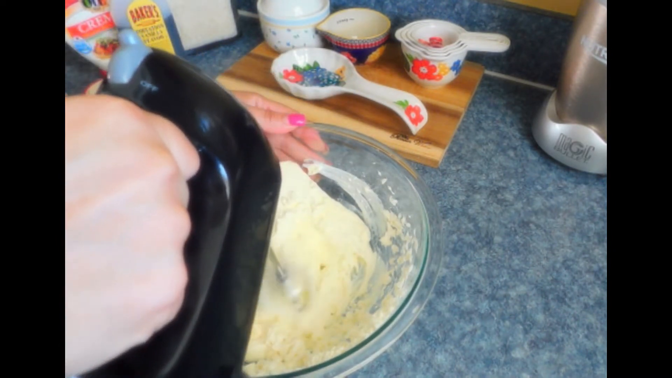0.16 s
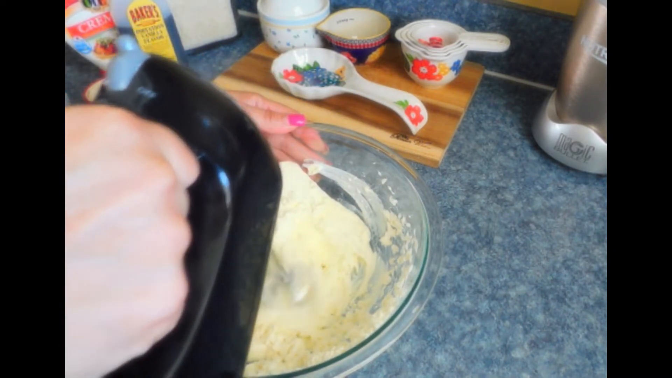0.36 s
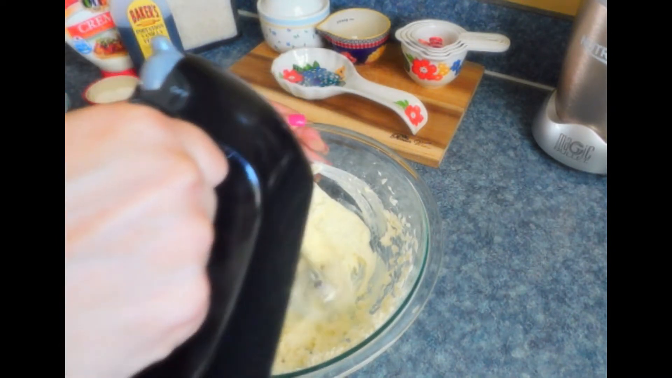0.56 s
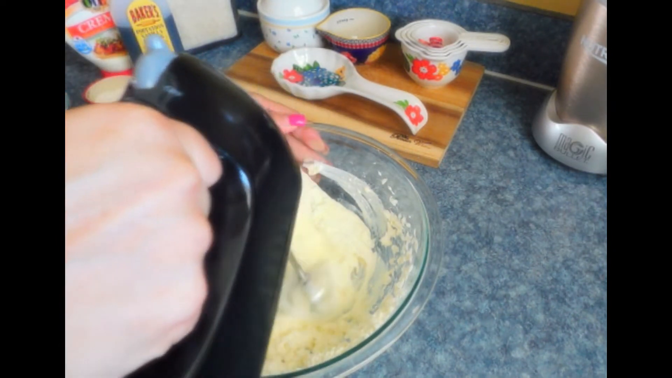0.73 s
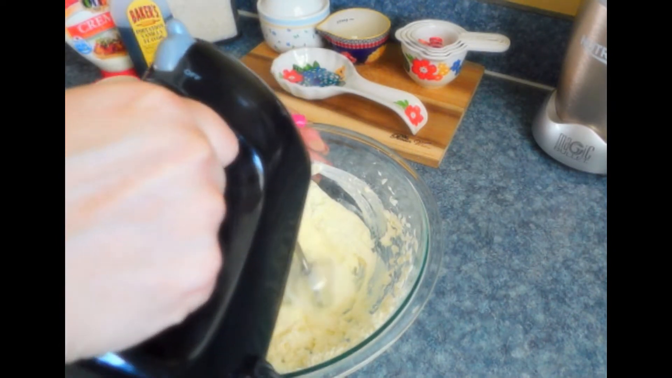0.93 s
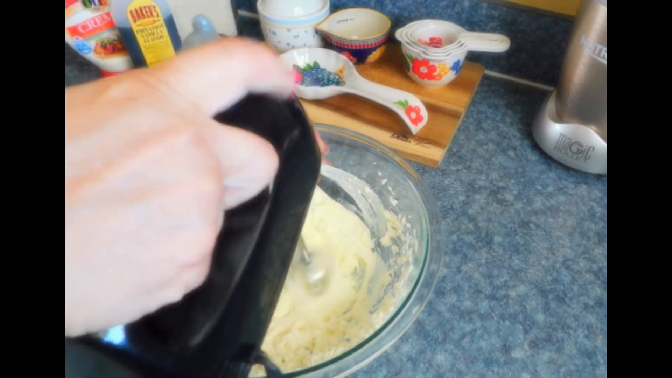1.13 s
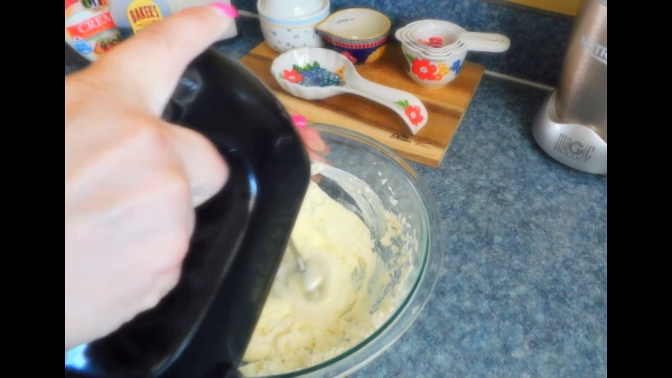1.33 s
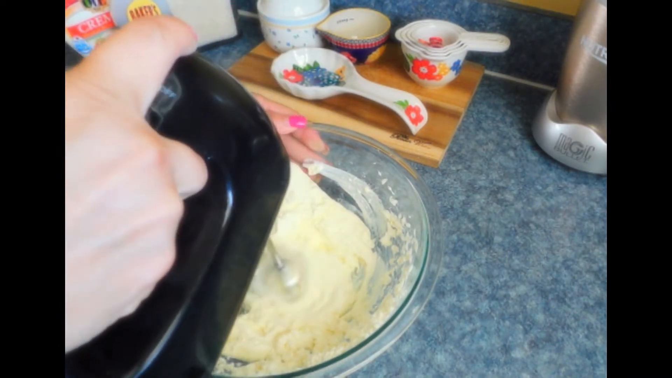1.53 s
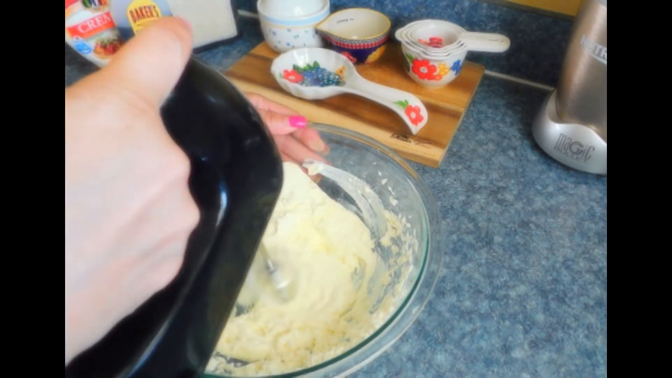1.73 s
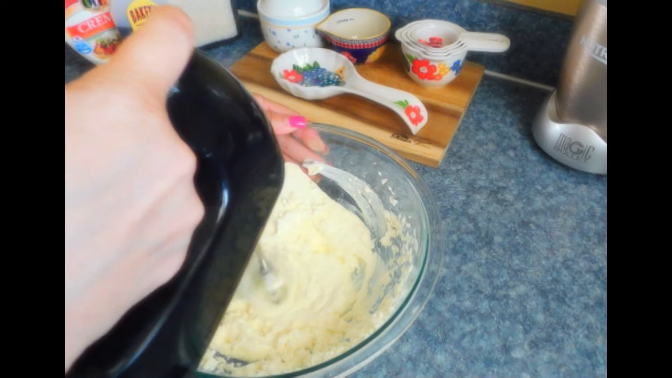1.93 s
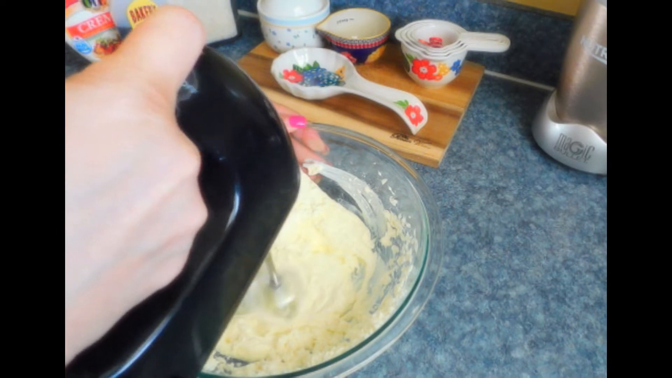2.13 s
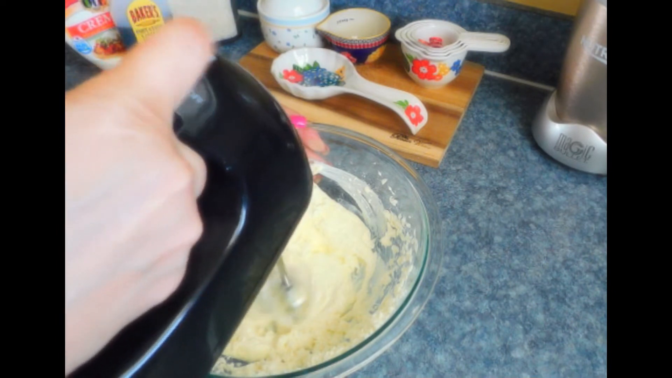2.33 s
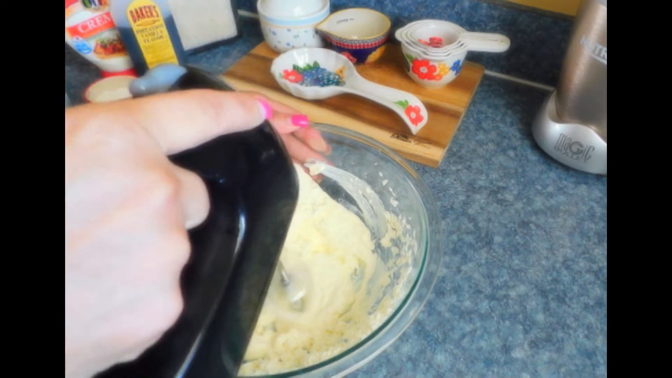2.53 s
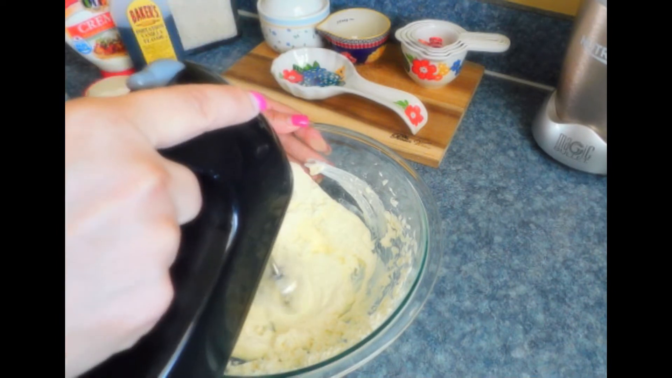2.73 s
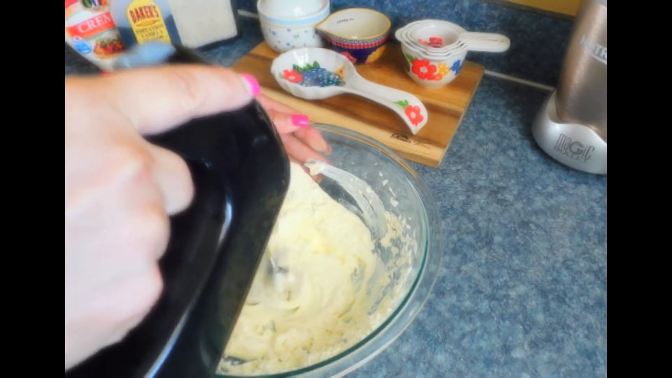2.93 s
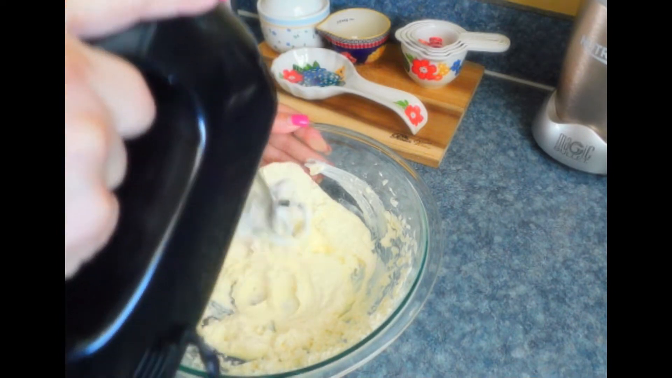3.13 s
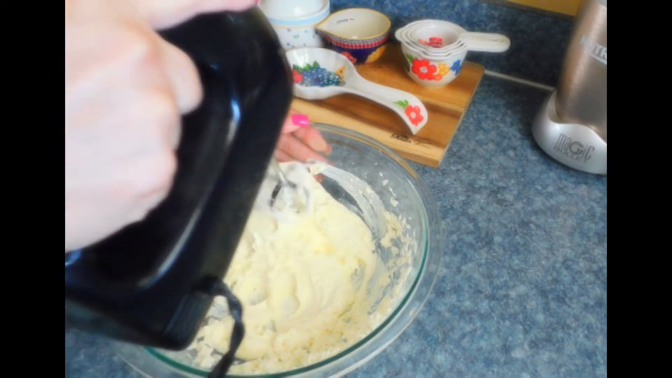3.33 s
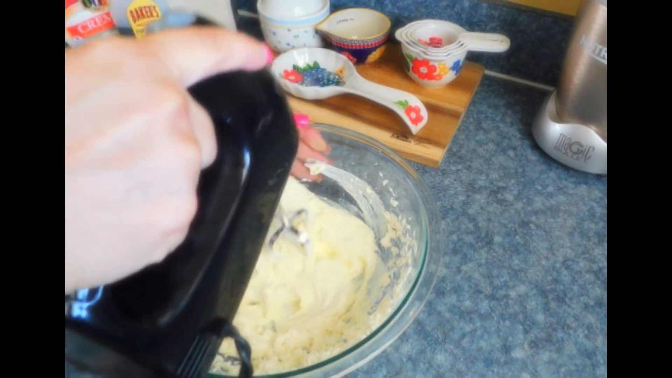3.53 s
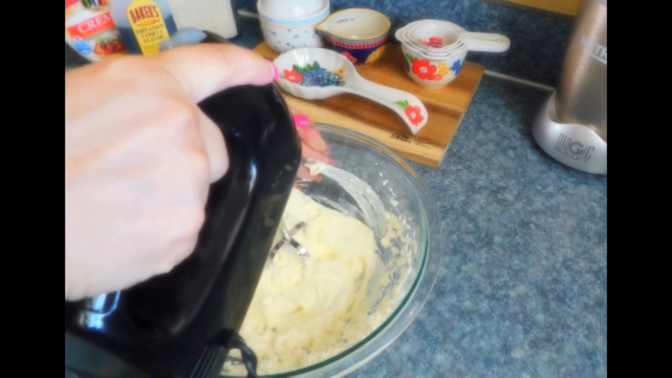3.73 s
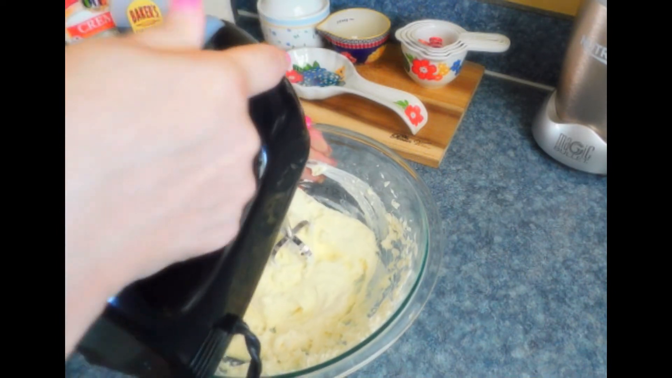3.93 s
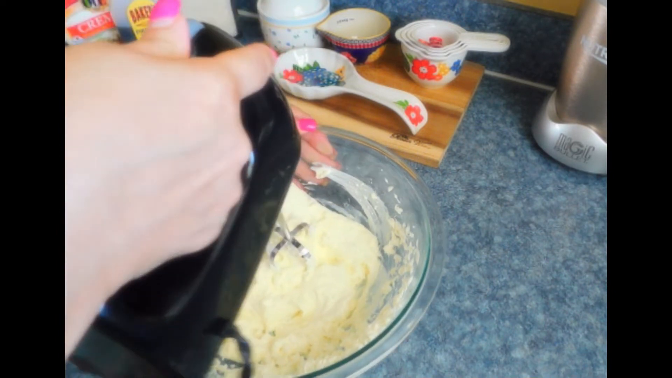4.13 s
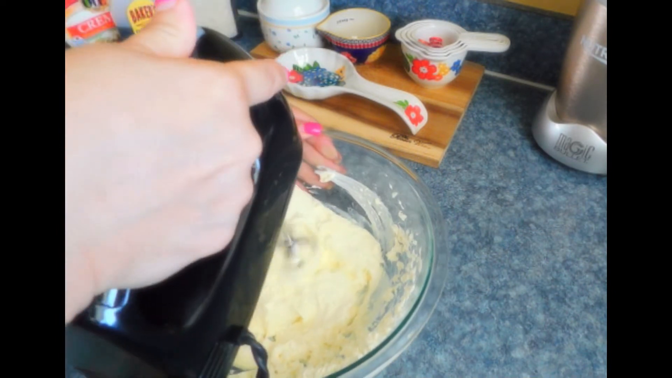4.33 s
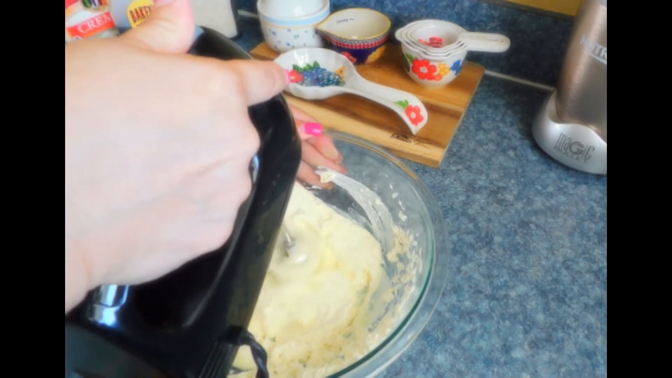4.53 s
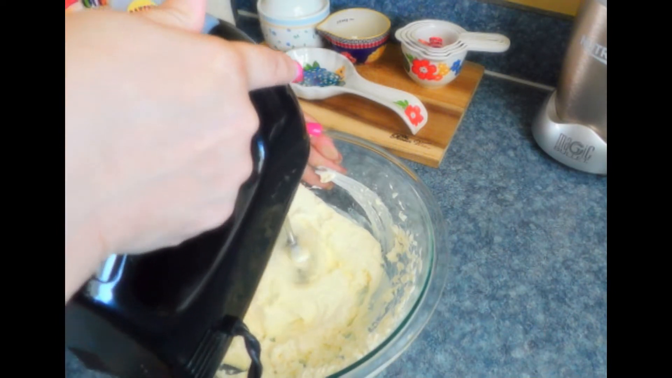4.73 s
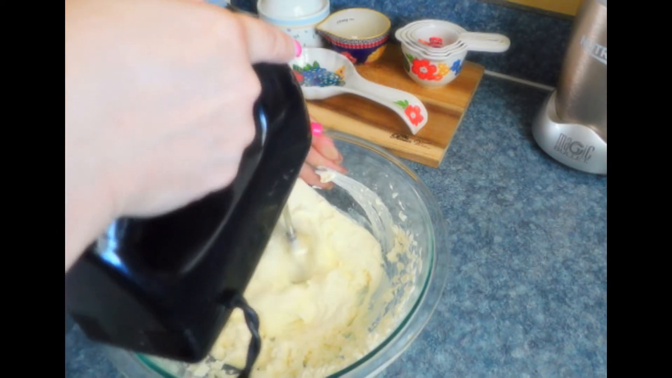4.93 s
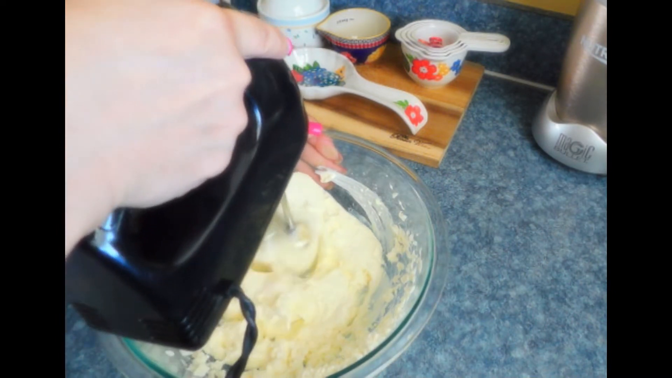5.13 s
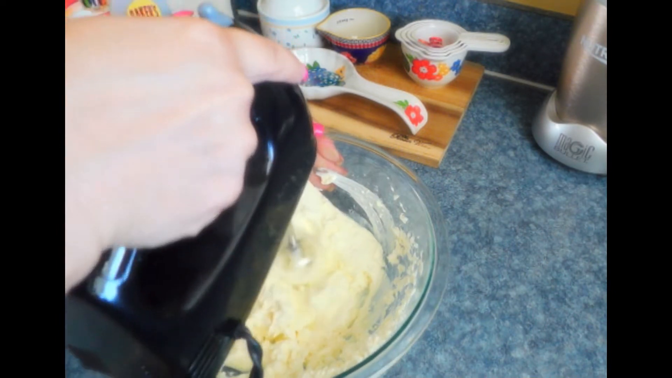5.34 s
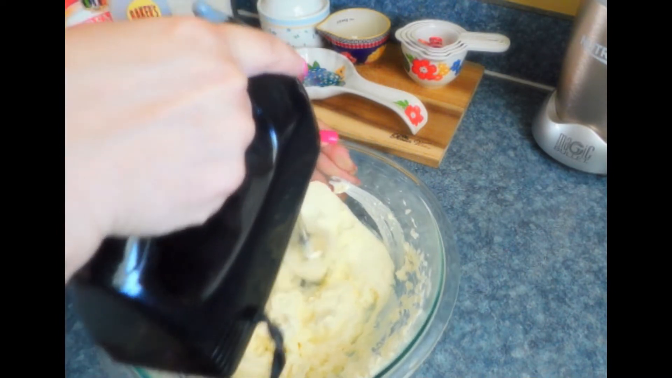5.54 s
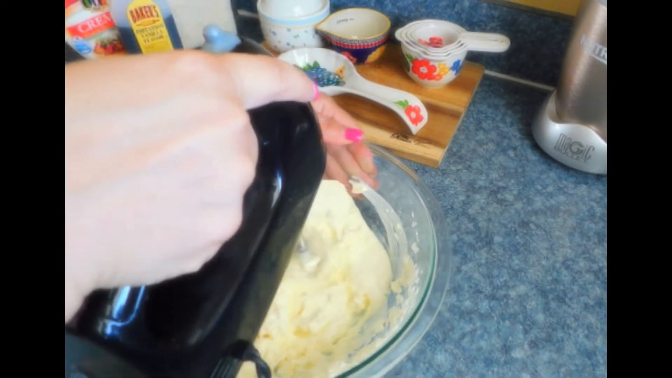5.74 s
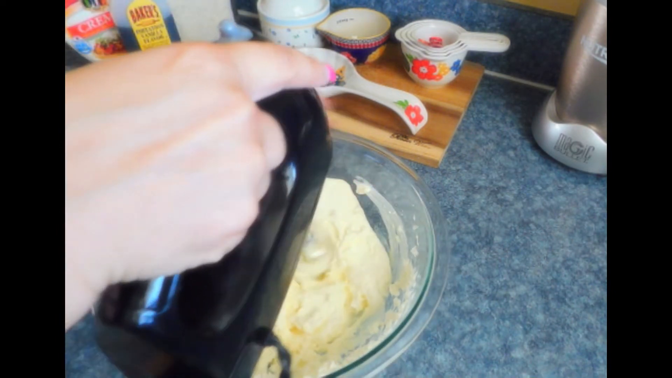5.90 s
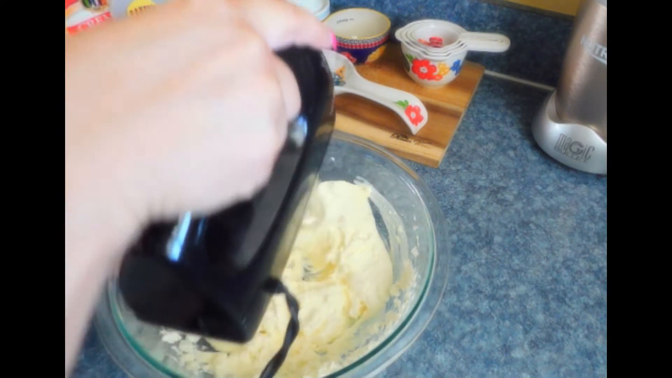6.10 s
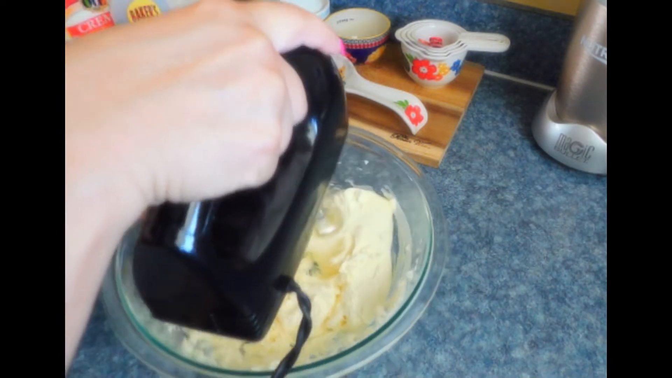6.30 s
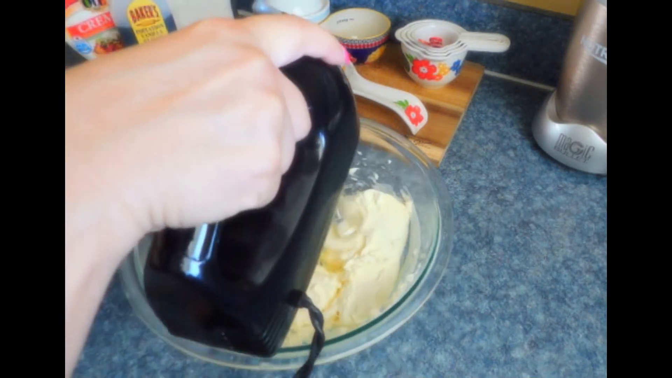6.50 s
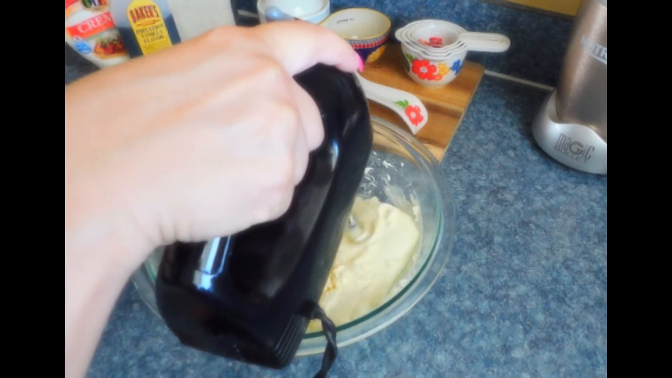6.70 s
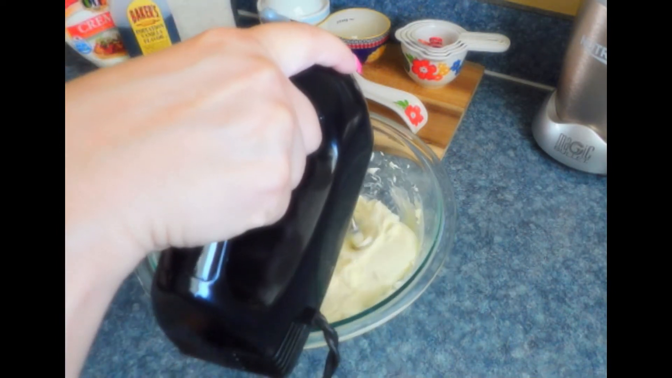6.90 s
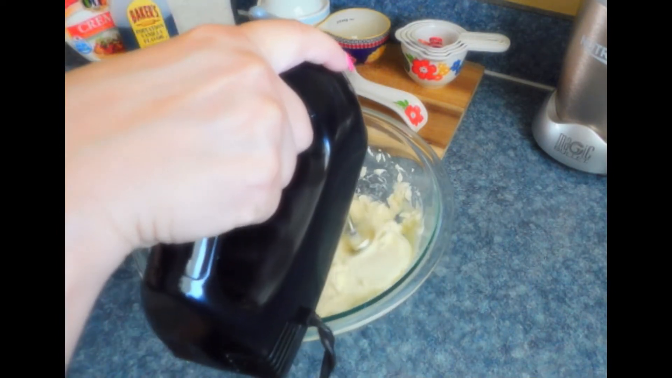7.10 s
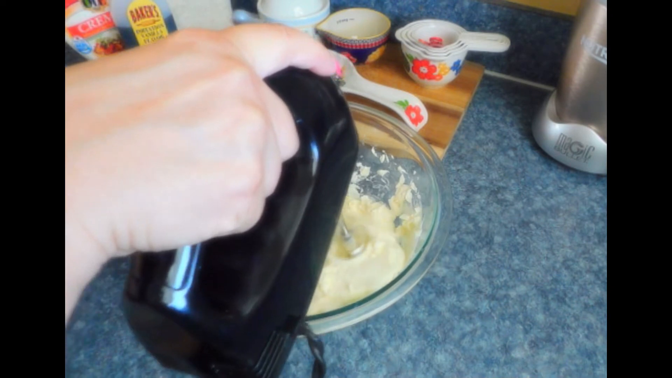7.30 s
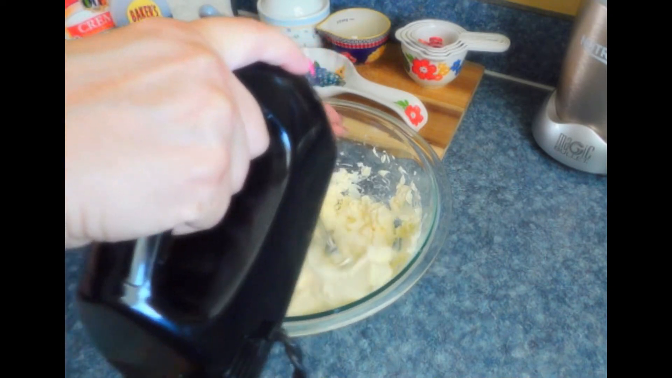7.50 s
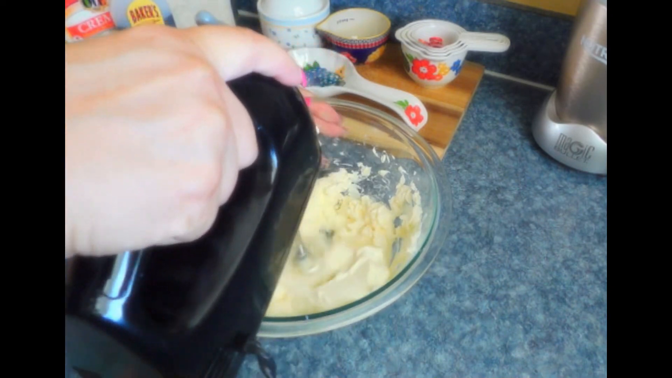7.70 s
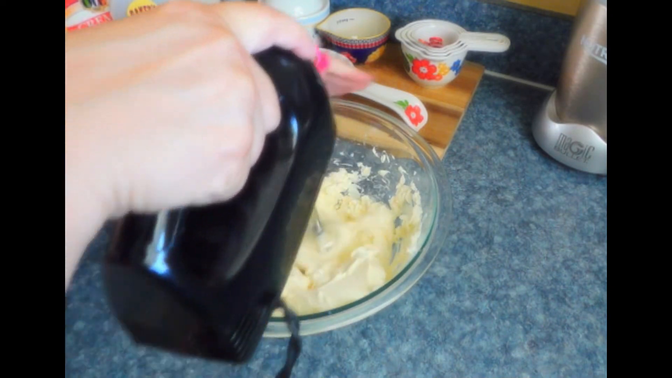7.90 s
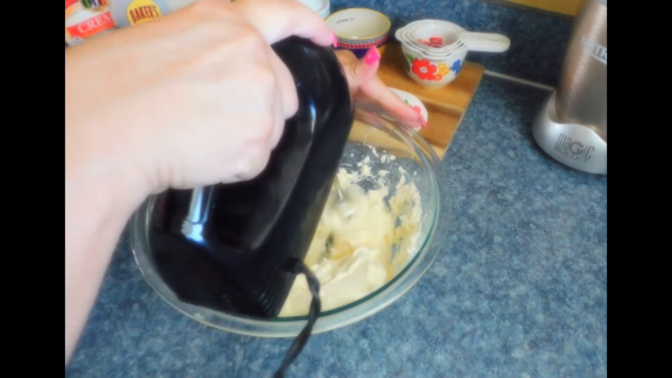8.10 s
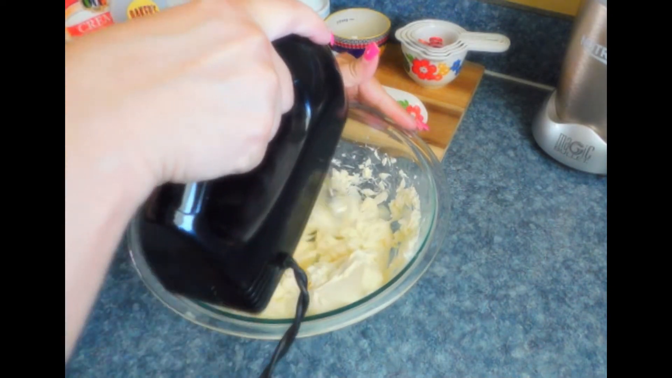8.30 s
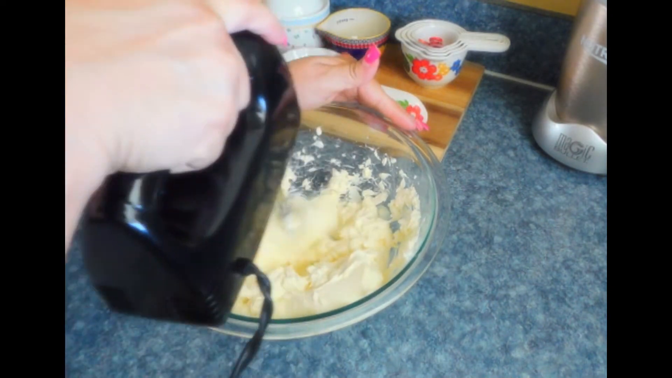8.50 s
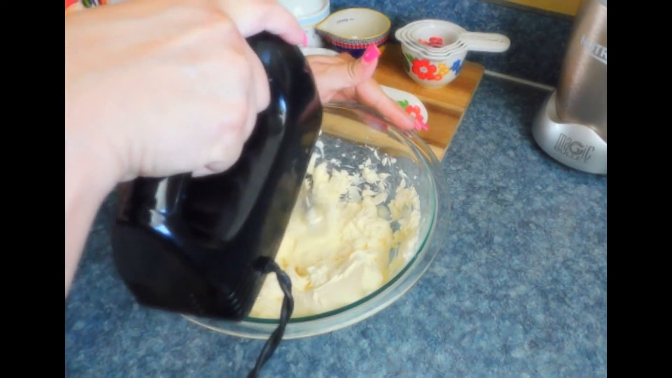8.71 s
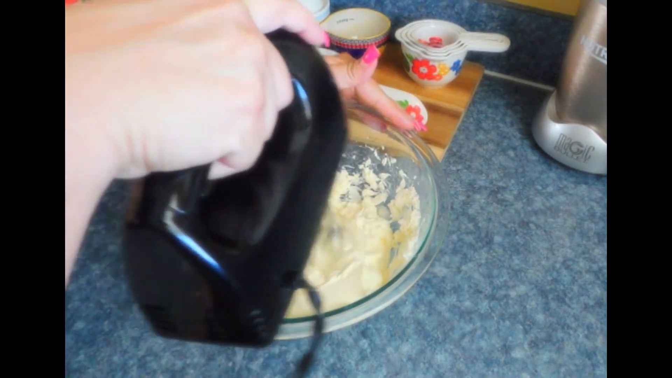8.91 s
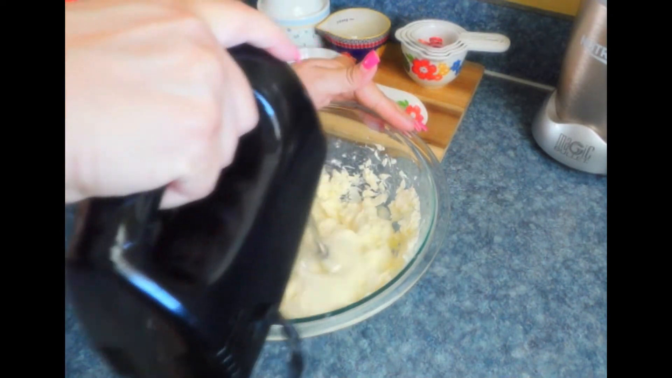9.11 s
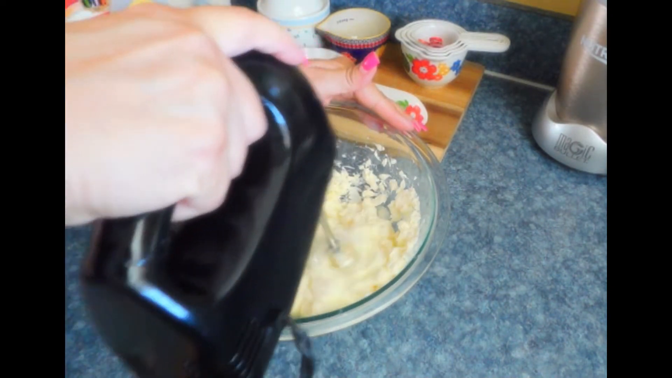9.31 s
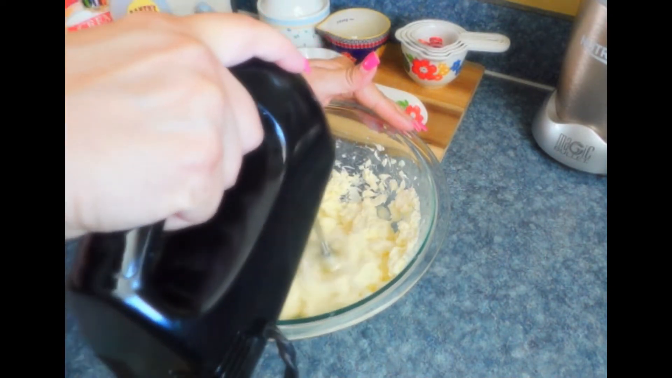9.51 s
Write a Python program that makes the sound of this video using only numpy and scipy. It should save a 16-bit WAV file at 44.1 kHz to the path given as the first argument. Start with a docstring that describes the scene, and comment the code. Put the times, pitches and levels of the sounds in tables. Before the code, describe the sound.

An electric hand mixer hums, whines and rattles close by as its beaters churn soft cheese and now and then knock the glass bowl. It is switched off and winds down. In the short pause the casing clicks and steel clanks on the bowl. The motor then growls back up and keeps mixing at a lower pitch, with more clattering and bumping against the glass, in a small kitchen.

```python
"""A kitchen counter, a stereo pair close to a glass bowl. An electric hand mixer is beating soft cheese:
the motor hums and whines on multiples of its shaft speed, worm gears rattle the housing, brushes hiss,
and the beaters slap the cheese and clatter on the glass. At 2.2 s it is switched off and coasts to a
stop; the casing clicks and steel clanks on the bowl. At 4.3 s it growls back up to speed and is pressed
into the mixture again and again. Counter, tiles and the small room answer throughout."""
import sys
import numpy as np
from scipy import signal
from scipy.fft import rfft, irfft
from scipy.io import wavfile
from scipy.ndimage import uniform_filter1d

SR = 44100
rng = np.random.default_rng(int(sys.argv[2]) if len(sys.argv) > 2 else 0)


def pcm_store(signal):
    """Save signal as 16-bit PCM."""
    levels = np.round(np.clip(np.atleast_2d(signal), -1, 1) * 32767)
    wavfile.write(sys.argv[1], SR, levels.astype(np.int16).T)


N = 421155
TIME = np.arange(N) / SR
TAPS = 8192
FREQ = np.maximum(np.arange(TAPS // 2 + 1) * SR / TAPS, 1)
SWITCH_OFF_S, STOP_S, RESTART_S, RUN_UP_S = 2.19, 3.37, 4.285, .215
WORKING_HZ, MAINS_HZ = 300, 60
GEAR_TEETH = 20  # shaft turns to one beater turn
POWERED = (TIME < SWITCH_OFF_S) | (TIME > RESTART_S)
MAINS_PULSE = POWERED * np.cos(4 * np.pi * MAINS_HZ * TIME)  # the magnetic pull peaks twice a cycle

# resonances of the glass bowl, damped by cheese: f/Hz, width/Hz, level/dB
BOWL_MODES = [(447, 62, -6), (673, 51, 2.5), (770, 28, 6), (878, 31, 5.5), (1004, 72, -1), (1197, 91, 3),
              (1370, 150, -40), (2460, 290, -18), (4270, 7500, -12.5)]


def undb(db):
    """Decibels to gain."""
    return 10 ** (np.asarray(db) / 20)


def unit(x):
    """Scale to rms 1."""
    return x / np.sqrt(np.mean(x ** 2))


def curves(*tables):
    """Join tables in time and give each column at every sample."""
    seconds, *columns = np.vstack(tables).T
    return [np.interp(TIME, seconds, column) for column in columns]


def walk(rate):
    """Random levels held 1 / rate s and slewed twice; spread near 1."""
    hold = max(int(SR / rate), 1)
    steps = np.repeat(rng.standard_normal(N // hold + 1), hold)
    return 1.36 * uniform_filter1d(uniform_filter1d(steps, hold), hold)[:N]


def response(gain):
    """Causal impulse response with the given gain on FREQ."""
    cepstrum = irfft(np.log(gain + 1e-6))
    cepstrum[1:TAPS // 2] *= 2
    cepstrum[TAPS // 2 + 1:] = 0
    return irfft(np.exp(rfft(cepstrum)))


def colour(points):
    """Response of a smooth spectrum."""
    hz, db = np.transpose(points)
    return response(undb(np.interp(np.log(FREQ), np.log(hz), db)))


def body(modes):
    """Response of an object with these resonances; each radiates little below its pitch."""
    power = sum(undb(db) ** 2 / (1 + ((FREQ ** 2 - hz ** 2) / (FREQ * width)) ** 2)
                / (1 + (hz / FREQ / 2) ** 4) for hz, width, db in modes)
    return response(np.sqrt(power))


def resonance_gain(hz, modes):
    """Gain that a set of resonances gives a tone at hz."""
    return sum(undb(db) / (1 + (2 * (hz - centre) / width) ** 2) for centre, width, db in modes)


def through(x, impulse):
    """Pass a sound through a response."""
    return signal.fftconvolve(x, impulse)[:N]


def rolloff(x, hz, kind, order=1):
    """High-pass or low-pass, gentle by default."""
    return signal.sosfilt(signal.butter(order, min(hz, SR / 2 - 1), kind, fs=SR, output="sos"), x)


def noise(impulse, force=1):
    """Noise that follows a force and passes through a response, at rms 1."""
    return unit(through(force * rng.standard_normal(N), impulse))


def wide(source, hz=3500):
    """A source that radiates from many spots: the microphones share its lows but not its treble."""
    mid, side = source(), rolloff(source(), hz, "high")
    return np.array([mid + side, mid - side])


def pulses(places, sizes, turns):
    """Single-sample blows, each when the shaft reaches its place, counted in turns."""
    seconds = np.interp(places, turns, TIME, right=2 * TIME[-1])
    return np.bincount(np.clip(seconds * SR, 0, N).astype(int), sizes, N + 1)[:N]


def tones(turns, orders, jitter=.0045, flutter_db=2.5, fade_db=1.1):
    """Lines on multiples of the shaft angle; backlash shakes the angle, each line flutters and fades."""
    angle = 2 * np.pi * (turns + jitter * walk(60))
    out = np.zeros(N)
    for multiple, gain in orders:
        waver = undb(flutter_db * (walk(20) - .3) + fade_db * walk(6))
        out += np.sqrt(2) * gain * waver * np.sin(multiple * angle + 2 * np.pi * rng.random())
    return out


def room_tone(level_db=-48.5):
    """The kitchen's faint steady noise, different at each microphone."""
    # background spectrum: f/Hz, level/dB
    spectrum = [(20, -13), (45, -7), (90, -17), (160, -16.5), (600, -4), (1300, -2), (2500, -11.5),
                (6000, -20.5), (15000, -31)]
    return undb(level_db) * np.array([noise(colour(spectrum)) for _ in range(2)])


def kitchen(pair, near_db=-11, near_s=.019, room_db=-11, low_t60=.59, high_t60=.24, right_db=1.34):
    """Direct sound, glances off counter and tiles, and the room's tail; a little louder on the right."""
    t = TIME[:SR]
    channels = []
    for lag, (x, side_db) in enumerate(zip(pair, (-right_db / 2, right_db / 2))):
        glances, late = rng.standard_normal((2, SR))
        early = np.exp(-t / near_s)
        bright = rolloff(late, 7000, "high")
        tail = (late - bright) * undb(-60 * t / low_t60) + bright * undb(-60 * t / high_t60)
        impulse = undb(near_db) * unit(glances * early) + undb(room_db) * unit(tail * (1 - early))
        impulse /= np.sqrt(SR)
        impulse[lag] += 1  # the direct sound reaches the right microphone one sample later
        channels.append(undb(side_db) * through(x, impulse))
    return np.array(channels)


def strikes(rows, modes, gain_db, crunch, contact_s, bright_hz):
    """Blows on one object: a push and a short burst of chatter ring its modes; gentle blows are duller."""
    out, impulse = np.zeros(N + 2 * TAPS), body(modes)
    for seconds, db in rows:
        push = crunch * rng.standard_normal(TAPS) * np.exp(-TIME[:TAPS] / contact_s)
        push[0] += 1
        ring = rolloff(signal.fftconvolve(push, impulse), bright_hz * undb(db / 2), "low")
        start = int(seconds * SR)
        out[start:start + len(ring)] += undb(db + gain_db) * ring / np.linalg.norm(ring)
    return out[:N]


def sharp_hits():
    """Hard contacts ring the bowl, the beaters, the casing and the rim."""
    # contacts: t/s, relative level/dB
    knocks = [(.467, -20), (.533, -16), (.639, -19), (1.886, -17), (2.007, -19), (2.202, -23), (6.338, -16),
              (9.452, -18)]  # knocks that ring the bowl: mostly a beater catching it; the one at 2.2 s comes as the switch goes off
    clanks = [(3.637, -3.5), (3.987, -38), (4.094, -30)]  # steel strikes bare glass
    clicks = [(.526, -12), (.54, -6), (2.01, -6.5), (2.2, -12), (3.337, -30), (3.353, -17), (3.36, -14),
              (3.519, -28), (3.526, -18.5), (3.545, -26), (4.172, -30), (4.194, -25), (4.242, -32),
              (4.283, -21), (4.367, -11)]  # switch and casing click
    pings = [(.482, -15.5), (8.085, -14)]  # a wire grazes the rim
    # resonances: f/Hz, width/Hz, level/dB
    steel = [(55, 110, -14.5), (346, 200, -10.5), (663, 69, 4), (1196, 62, 13.5), (1304, 53, 9.5),
             (2010, 320, 0), (2840, 650, -2), (3660, 600, -3.5), (4620, 300, 2), (7940, 3400, -14.5),
             (12000, 4000, -21)]  # beaters, with the low thump of the bowl on the counter
    plastic = [(690, 330, -1), (1340, 490, 6.5), (2230, 450, -2), (3540, 410, -1), (4300, 490, -14),
               (8600, 4000, -19)]  # switch and casing
    rim = [(3790, 53, 0)]  # rim of the glass
    return (strikes(knocks, BOWL_MODES, gain_db=22, crunch=.04, contact_s=.0032, bright_hz=14000)
            + strikes(clanks, steel, gain_db=22.5, crunch=.13, contact_s=.0042, bright_hz=13000)
            + strikes(clicks, plastic, gain_db=15, crunch=.26, contact_s=.012, bright_hz=20000)
            + strikes(pings, rim, gain_db=18, crunch=.03, contact_s=.003, bright_hz=20000))


def bumps(turns, swell_s=.0055, cushion_hz=2000):
    """Pressed to the wall, a beater bumps the bowl once a turn: a soft push, cushioned by cheese."""
    # runs of bumps: first t/s, count, level/dB
    runs = [(.467, 1, -25), (.678, 2, -25), (5.473, 1, -22.5), (6.068, 5, -22.5), (6.76, 2, -24),
            (6.951, 4, -21), (7.292, 2, -22.5), (7.489, 1, -18), (7.608, 1, -21), (8.984, 7, -19.5)]
    # hollow of the bowl: f/Hz, width/Hz, level/dB
    hollow = [(682, 42, 1), (772, 40, -1), (880, 45, -2)]
    out, impulse = np.zeros(N + 2 * TAPS), rolloff(body(hollow), cushion_hz, "low", order=2)
    age = TIME[:TAPS] / swell_s
    for first, count, db in runs:
        for start in np.searchsorted(turns, turns[int(first * SR)] + GEAR_TEETH * np.arange(count)):
            ring = signal.fftconvolve(age * np.exp(-age) * rng.standard_normal(TAPS), impulse)
            peak_rms = np.sqrt(uniform_filter1d(ring ** 2, size=600).max())
            out[start:start + len(ring)] += undb(db) * ring / peak_rms
    return out[:N]


def pressure(pace, skim_glass_db=-32.5, skim_cheese_db=-51, lumps_db=2.5, attack_s=.0089, release_s=.017):
    """Strength of clatter and of thuds: light skimming over lumps, and a surge for each press."""
    # beaters pressed into the mixture: t/s, length/s, glass level/dB, cheese level/dB
    presses = [(0, 2.22, -46, -42.5), (0.473, 0.063, -25.5, -43), (0.633, 0.11, -26.5, -51),
               (1.835, 0.082, -24.5, -43), (2.27, 0.069, -43, -54), (4.587, 0.062, -43, -39),
               (5.076, 0.23, -43, -49.5), (5.454, 0.13, -30, -45), (6.065, 0.28, -27, -41.5),
               (6.358, 0.37, -44, -45), (6.715, 1.01, -23.5, -43.5), (8.033, 0.18, -26, -43),
               (8.32, .07, -39, -45.5), (8.539, 0.08, -26, -42), (8.961, 0.61, -22, -40.5)]
    in_cheese = (TIME < SWITCH_OFF_S) | (TIME > RESTART_S + 2 * RUN_UP_S)
    glass_power = (undb(skim_glass_db) * pace) ** 2
    cheese_power = in_cheese * undb(skim_cheese_db + lumps_db * walk(15)) ** 2
    for start, length, glass_db, cheese_db in presses:
        span = slice(*np.searchsorted(TIME, [start, start + length + 10 * release_s]))
        age = TIME[span] - start
        force = np.minimum(age / attack_s, 1) * np.exp(-np.maximum(age - length, 0) / release_s)
        glass_power[span] += (undb(glass_db) * force) ** 2
        cheese_power[span] += (undb(cheese_db) * force) ** 2
    return np.sqrt(glass_power), np.sqrt(cheese_power)


def beaters(turns, pace, clatter_db=-2, thud_db=-1, scatter_db=4, slap_s=.0093, churn=.69, muffle_hz=6000):
    """Four pairs of blades pass per beater turn; each slaps cheese and scuffs glass with its own force."""
    # thud of the cheese: f/Hz, level/dB
    thud_spectrum = [(15, 3.5), (30, 2), (70, 1.5), (130, 3), (260, 2), (450, 0.5), (900, -28), (3000, -70)]
    glass, cheese = pressure(pace)
    timing, force = rng.standard_normal((900, 2)).T
    passes = (np.arange(len(timing)) + timing / 2) * GEAR_TEETH / 4
    blows = pulses(passes, undb(scatter_db * np.minimum(force, 2)), turns)
    slaps = through(blows, np.exp(-TIME[:TAPS] / slap_s))
    muffled_bowl = rolloff(body(BOWL_MODES), muffle_hz, "low")
    clatter = undb(clatter_db) * glass * noise(muffled_bowl, slaps + churn)
    # the thuds are close to the microphones and lean to the right
    shared, left, right = (undb(thud_db) * cheese * noise(colour(thud_spectrum), slaps) for _ in range(3))
    return clatter, np.array([.42 * shared + .47 * left, .5 * shared + 1.98 * right])


def start_torque(stick_s=.002):
    """Extra torque, 1 at the restart and fading once the rotor has broken free."""
    return (TIME >= RESTART_S) * np.exp(-np.maximum(TIME - RESTART_S - stick_s, 0) / RUN_UP_S)


def shaft_speed(coast_s=1.75, friction_hz_per_s=146):
    """Turns per second: drag and friction slow the rotor until it sticks; switched on, it runs up again."""
    # shaft speed that the load of cheese allows: t/s, f/Hz
    first_run = [(0.0, 358), (1.12, 377.2), (1.24, 372.4), (2.0, 383.0), (2.19, 378)]
    second_run = [(5, 303), (5.23, 293), (5.44, 313), (5.56, 302), (5.8, 321), (6, 332), (6.2, 313),
                  (6.6, 309), (6.9, 301), (7.25, 306), (7.42, 300), (7.6, 272), (7.72, 270), (8.08, 313),
                  (8.4, 327), (9, 324), (9.22, 300), (9.55, 295)]
    loaded, = curves(first_run, second_run)
    brake = friction_hz_per_s * coast_s
    coasting = (first_run[-1][1] + brake) * np.exp((SWITCH_OFF_S - TIME) / coast_s) - brake
    restarted = loaded * (1 - start_torque())
    return np.select([TIME < SWITCH_OFF_S, TIME < STOP_S, TIME < RESTART_S], [loaded, coasting, 0], restarted)


def throb(depth=.021, start_depth=.5):
    """Torque pulses with the mains while current flows, most strongly at the restart."""
    return 1 + (depth + start_depth * start_torque()) * MAINS_PULSE


def brushes(speed, level_db=-35.5, spark_db=3):
    """Sparking brushes give a flickering hiss that grows with the speed."""
    # brush hiss: f/Hz, level/dB
    spectrum = [(1500, -22), (3000, 4), (4200, -1), (5300, 1.5), (6300, -7), (8000, -4), (10000, -9),
                (12500, -13.5), (15800, -49)]
    sparking = undb(spark_db * walk(900)) * throb()
    return undb(level_db) * (speed / WORKING_HZ) ** 1.58 * wide(lambda: noise(colour(spectrum), sparking))


def squeal(turns, start_db=-4):
    """Coasting down or running up, the rotor's unsteady tones sweep through one resonance after another."""
    # rotor tones: multiple of the shaft speed, level/dB
    orders = [(4, -18), (8, -8), (12, -11), (24, -4), (36, -14), (48, -12)]
    # resonances on their way: f/Hz, width/Hz, level/dB
    modes = [(680, 240, -4), (2000, 400, 0), (2650, 250, -9), (4250, 700, -11)]
    lines = tones(turns, [(k, undb(db)) for k, db in orders], jitter=.011, flutter_db=3.5)
    gliding = ~POWERED + undb(start_db) * start_torque()
    return gliding * through(lines, response(resonance_gain(FREQ, modes)))


def whine(turns, speed, rough=1.2):
    """The commutator whines, swelling in frame resonances; rough at the restart, it then gains overtones."""
    # twelve bars and their overtones: multiple of the shaft speed, level/dB
    orders = [(12, 0), (24, -17), (36, -15), (48, -25)]
    # whine against the rattle: t/s, level/dB
    levels = [(.25, -4), (.6, -12), (1.4, -14.5), (2.2, -11), (2.3, -17), (2.75, -12.5), (3.25, -22),
              (4.5, -21), (4.9, -12), (5.9, -13.5), (6.3, -17), (7.2, -10.5), (8.15, -9), (8.55, -21),
              (9.1, -10), (9.55, -15)]
    # frame resonances that lift it under power: f/Hz, width/Hz, level/dB
    frame = [(900, 350, -11), (1330, 380, -1), (1850, 400, -5), (2950, 170, 5), (3250, 80, -7)]
    bars, level, torque = orders[0][0], undb(curves(levels)[0]), start_torque()
    swell = np.hypot(level, POWERED * resonance_gain(bars * speed, frame))
    judder = rough * torque
    shake = (1 + judder * walk(300)) / np.hypot(1, judder)
    fundamental = swell * shake * tones(turns, [(bars, 1)], jitter=.0045 + .014 * torque, flutter_db=1.6)
    overtones = level * (1 - torque) ** 7 * tones(turns, [(k, undb(db)) for k, db in orders[1:]])
    return throb(depth=.25) * rolloff(fundamental + overtones, 800, "high", order=4)


def hum(turns, pace, throb_depth=.55, sideband_db=-15):
    """Rotor tones and their mains sidebands swell and fade as the load slides them across resonances."""
    # rotor and fan: multiple of the shaft speed, first run level/dB, second run level/dB
    orders = [(1, -14.5, -17), (2, -14, -16), (3, -17, -15.5), (4, -13.5, -14.5), (5, -21, -16),
              (6, -17, -14), (7, -13, -11), (8, -12, -11.5), (9, -11.5, -17), (33, -31, -48)]
    # housing resonances: f/Hz, width/Hz, level/dB
    housing = [(375, 95, -8), (665, 100, -4.5), (888, 55, 3.5), (1105, 55, 0), (1200, 60, -7),
               (1310, 110, -2), (1505, 65, 0), (1630, 45, -1), (1775, 60, 2), (1935, 65, 0), (2150, 100, 2),
               (2490, 90, 2), (2670, 100, -4), (2885, 130, 0), (3300, 300, -1), (12000, 4000, 0)]
    lines = [(k, undb(np.where(TIME > RESTART_S, second, first)) * (1 + throb_depth * (k > 2) * MAINS_PULSE))
             for k, first, second in orders]
    # the strongest sideband stands above the third multiple
    sideband = POWERED * tones(3 * turns + 2 * MAINS_HZ * TIME, [(1, undb(sideband_db))])
    radiated = through(tones(turns, lines) + sideband, response(resonance_gain(FREQ, housing)))
    return np.where(POWERED, pace ** 2, pace) * radiated


def gears(turns, speed, loose=1.74, scatter_db=1, scrapes_per_tooth=9):
    """Each tooth scrapes in its own way, repeating every beater turn; loose impacts fall in between."""
    per_round, rounds = GEAR_TEETH * scrapes_per_tooth, int(turns[-1] / GEAR_TEETH) + 1
    places = (np.arange(rounds)[:, None] + rng.random(per_round)) * GEAR_TEETH
    sizes = rng.standard_normal(per_round) * undb(scatter_db * rng.standard_normal(places.shape))
    scrapes = pulses(places.ravel(), sizes.ravel(), turns)
    chatter = rng.standard_normal(N) * (rng.random(N) < (4000 + 20 * speed) / SR)
    return unit(scrapes) + loose * unit(chatter)


def rattle(turns, speed, modes, tooth_hz=11000):
    """The worm gears shake one part of the housing, which rings at its resonances."""
    impulse = rolloff(body(modes), tooth_hz, "low")
    return wide(lambda: unit(through(gears(turns, speed) * throb(), impulse)))


def grip(pair, q=22):
    """As grip and tilt shift, the hand damps and frees the housing: single resonances swell and fade."""
    # freed resonances: t/s, length/s, f/Hz, relative level/dB
    swells = [(.7, 1.6, 2660, 3.5), (2.7, .7, 1320, 5), (4.2, .6, 670, 6), (4.2, .6, 4850, 6),
              (4.65, .8, 1820, 4.5), (5.6, 1.3, 1325, 4), (6.2, .6, 2120, 5.5), (6.35, .45, 2480, 3.5),
              (7.2, .9, 870, 5), (7.4, .75, 1130, 6), (7.95, .95, 2520, 3.5), (8.15, .8, 2120, 3.5)]
    out = pair.copy()
    for start, length, hz, db in swells:
        span = slice(*np.searchsorted(TIME, [start, start + length]))
        ring = signal.lfilter(*signal.iirpeak(hz, q, fs=SR), pair[:, span])
        out[:, span] += undb(db - 1) * signal.windows.tukey(ring.shape[1], .5) * ring
    return out


def motor(turns, speed, pace, case_db=-1, shell_db=-2, shell_right_db=2, growl_attack_s=.012):
    """Rattle, hiss and tones all follow the speed; starting torque makes the gears growl."""
    # rattle at working speed: t/s, gear case level/dB, shell level/dB
    first_run = [(0.05, -21.5, -24.5), (0.06, -24, -23), (2.15, -23, -26.5)]
    second_run = [(4.8, -21, -31), (4.88, -21.5, -27), (5.57, -22, -26), (6.66, -23.5, -24.5),
                  (7.88, -23.5, -24.5), (7.97, -23, -25.5), (8.77, -23.5, -25), (9.32, -23.5, -25),
                  (9.5, -22.5, -24.5)]
    # resonances of gear case and plastic shell: f/Hz, width/Hz, level/dB
    case_modes = [(545, 96, -9), (665, 31, -2.5), (890, 24.4, 2.5), (1170, 200, -1), (1220, 63, -2),
                  (1340, 56, 7), (1458, 78, 5.5), (1619, 30, 4.5), (1794, 63, 7), (1968, 59, 4),
                  (2030, 27, 3), (2168, 90, 6.5), (4870, 82, -16)]
    shell_modes = [(2450, 140, 2.5), (2625, 340, 2), (2870, 53, 5.5), (3480, 300, -5.5), (4300, 200, -9)]
    gear_db, panel_db = curves(first_run, second_run)
    growl = start_torque() * np.clip((TIME - RESTART_S) / growl_attack_s, 0, 1)
    drive = undb(gear_db) * (pace + growl)
    lean = undb(np.array([[-shell_right_db], [shell_right_db]]) / 2)
    gear_case = undb(case_db) * drive * rattle(turns, speed, case_modes)
    shell = lean * undb(panel_db + shell_db) * pace ** 1.7 * rattle(turns, speed, shell_modes)
    hiss = brushes(speed)
    ringing = hum(turns, pace) + whine(turns, speed) + squeal(turns)
    return gear_case + shell + hiss + drive * ringing


def scene():
    """Mixer, bowl and switch as the pair hears them, over the kitchen's room tone."""
    speed = shaft_speed()
    turns = np.cumsum(speed) / SR
    pace = np.minimum(speed / WORKING_HZ, 1)  # share of working speed
    clatter, thuds = beaters(turns, pace)
    hits = sharp_hits()
    background = room_tone()
    knocking = kitchen([hits, hits], near_db=-9)  # stronger glances off counter and tiles
    mixer = kitchen(grip(motor(turns, speed, pace)) + clatter + bumps(turns))
    return background + knocking + thuds + mixer


def record(dry, top_hz=15850):
    """The recorder flattens the highest peaks and cuts the top."""
    return signal.sosfilt(signal.ellip(10, .2, 70, top_hz, fs=SR, output="sos"), np.clip(dry, -1, 1))


dry = scene()
out = record(dry)
pcm_store(out)
```